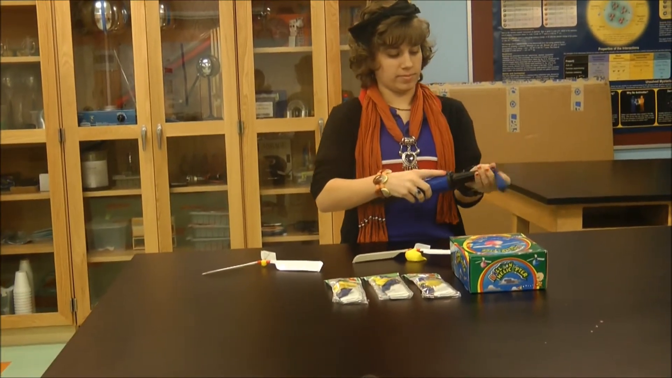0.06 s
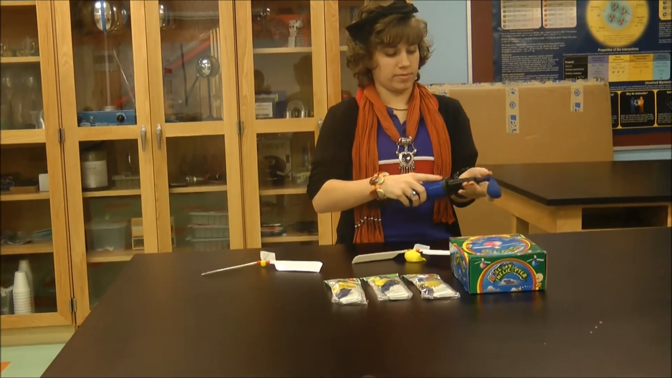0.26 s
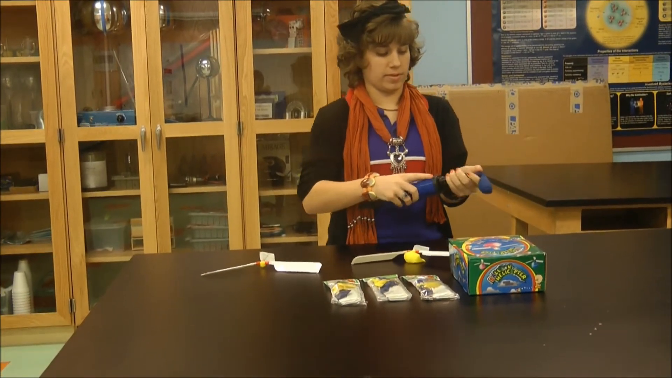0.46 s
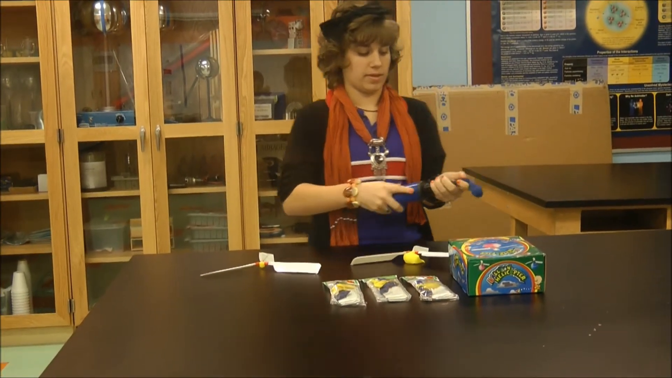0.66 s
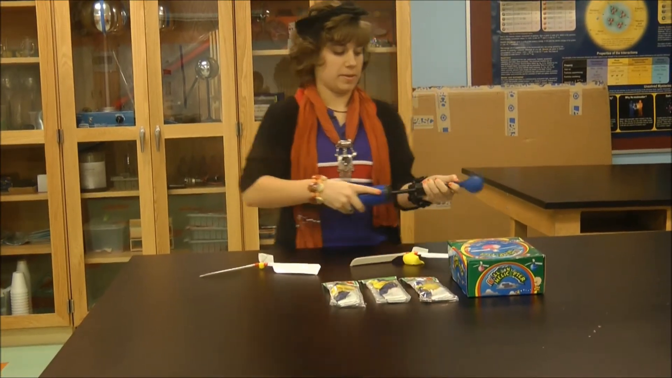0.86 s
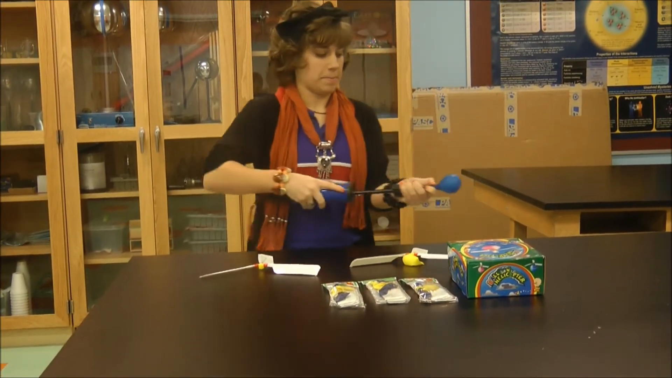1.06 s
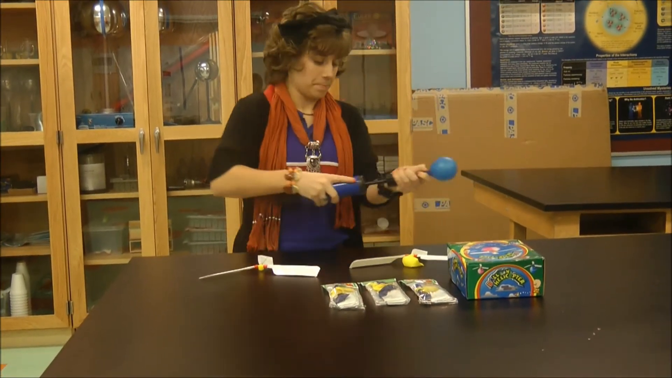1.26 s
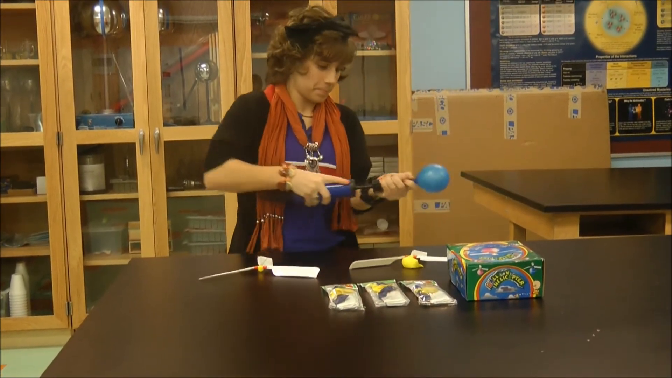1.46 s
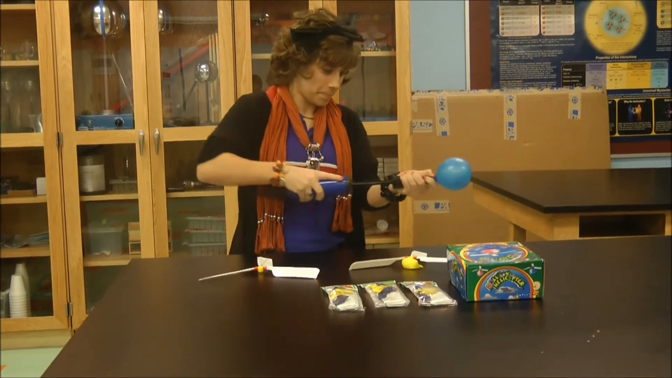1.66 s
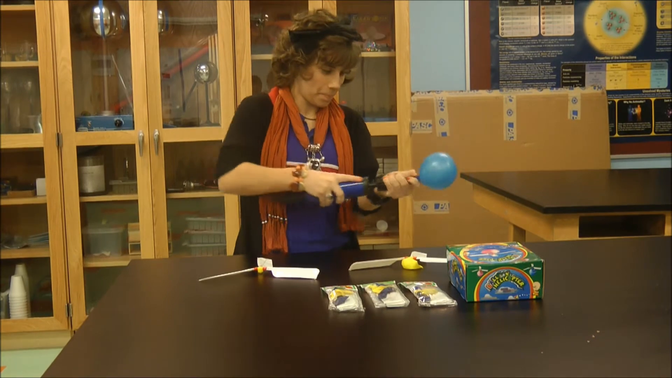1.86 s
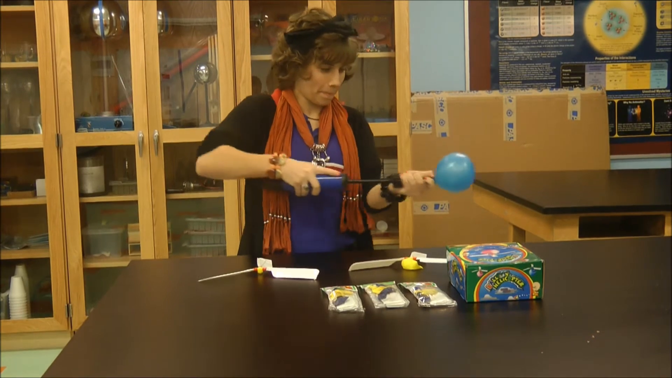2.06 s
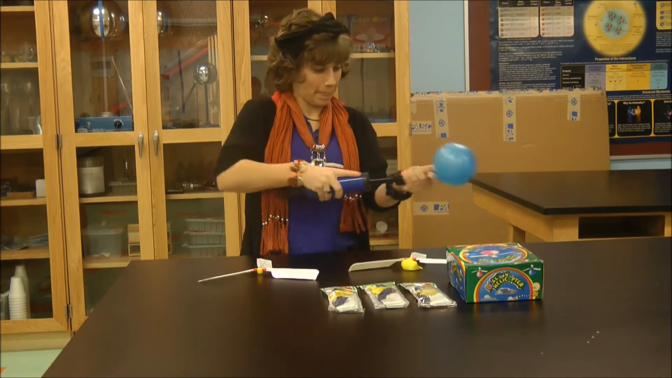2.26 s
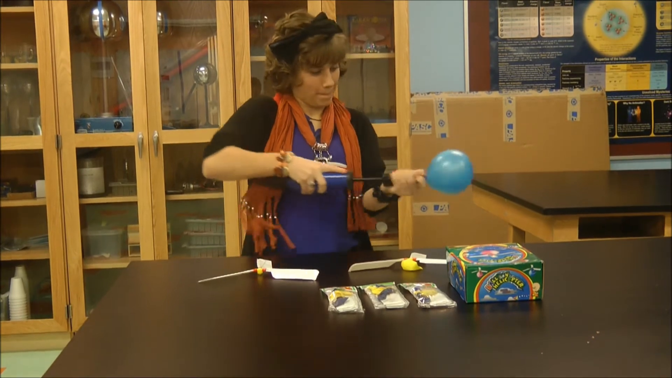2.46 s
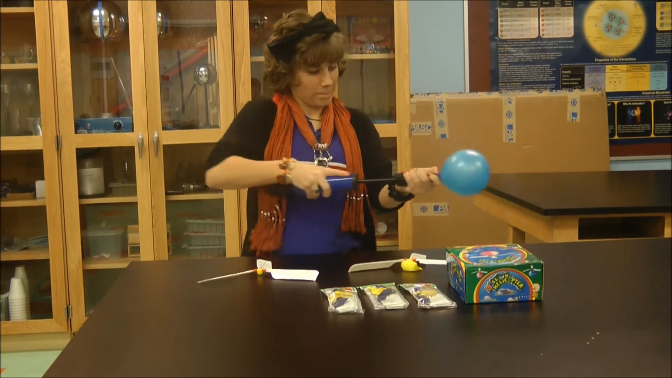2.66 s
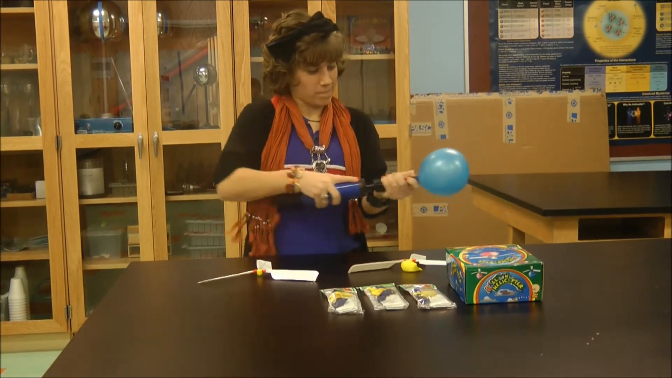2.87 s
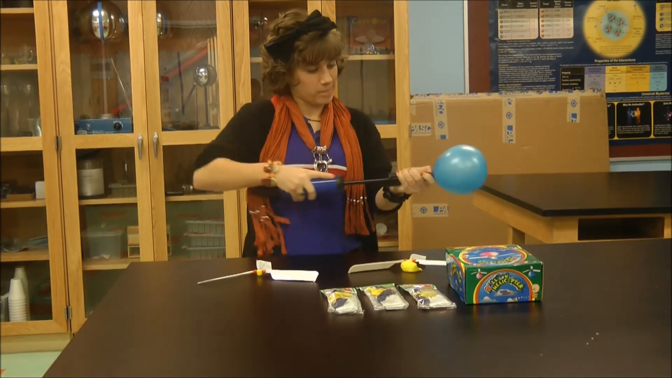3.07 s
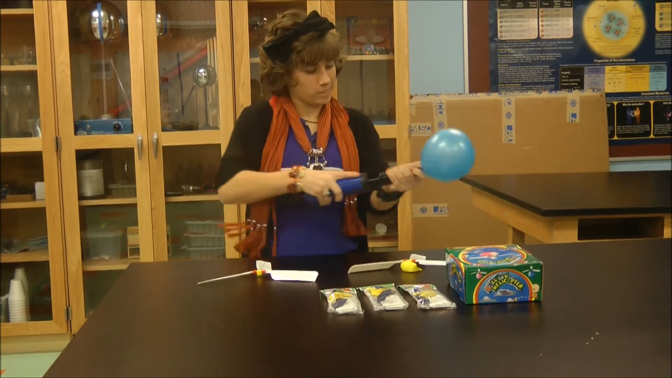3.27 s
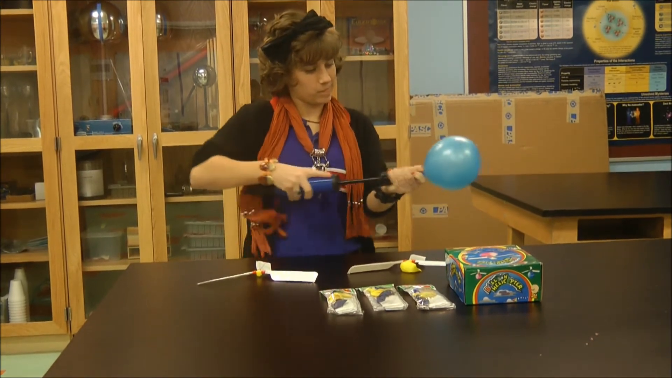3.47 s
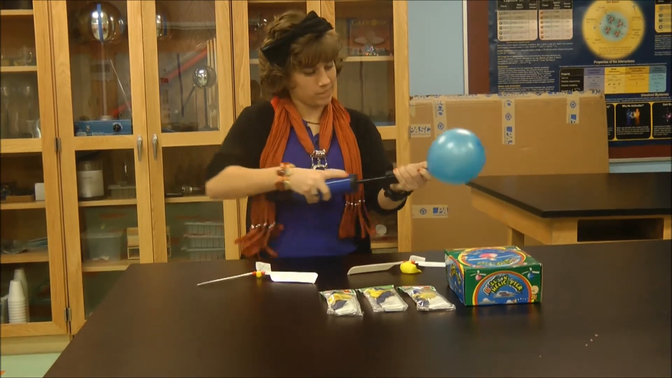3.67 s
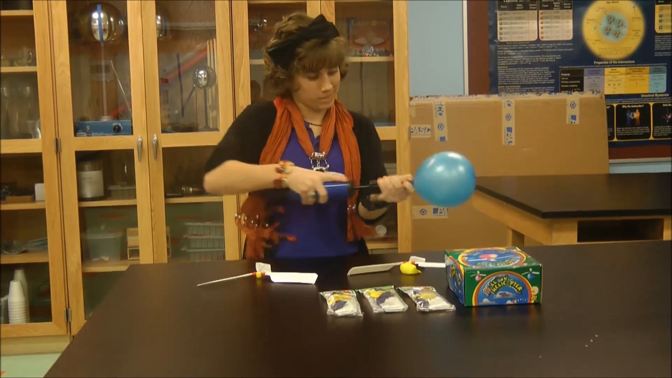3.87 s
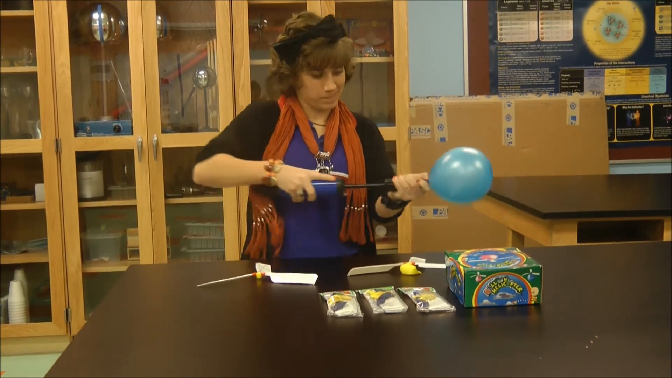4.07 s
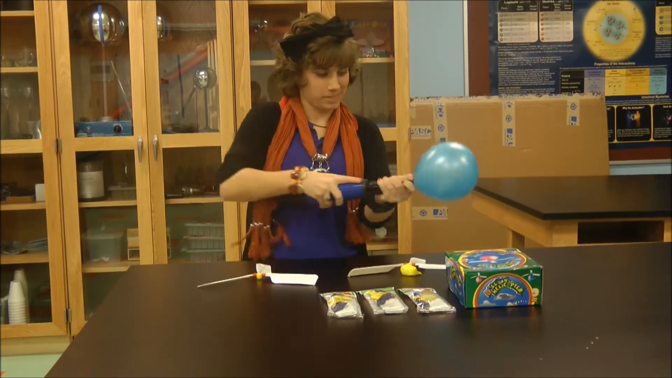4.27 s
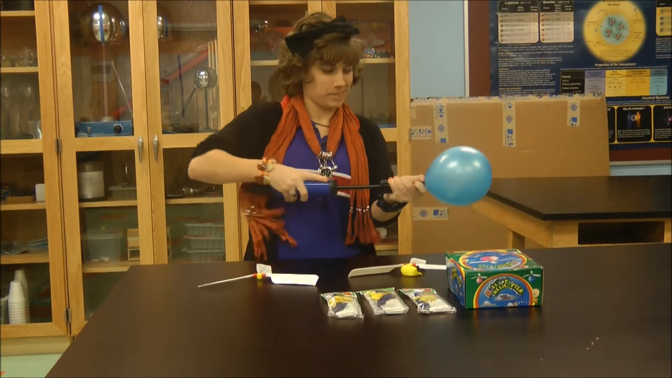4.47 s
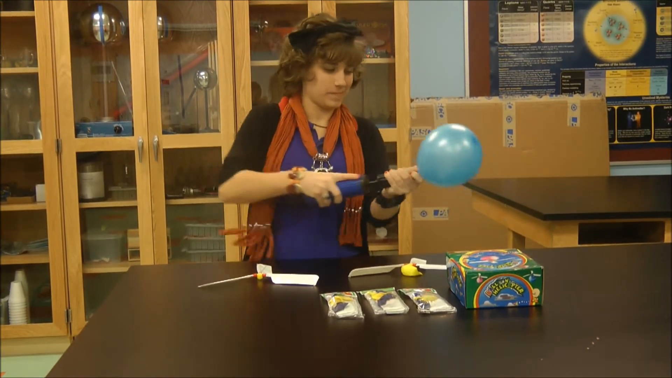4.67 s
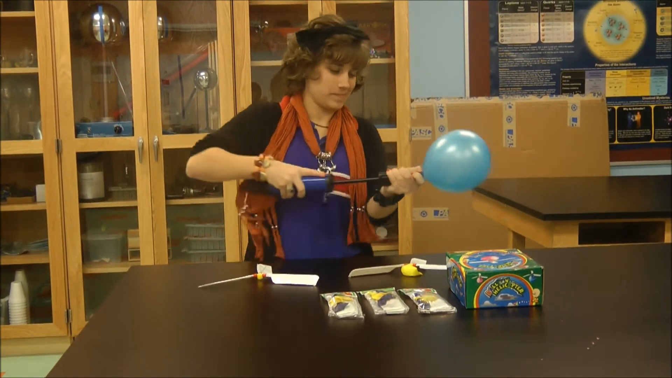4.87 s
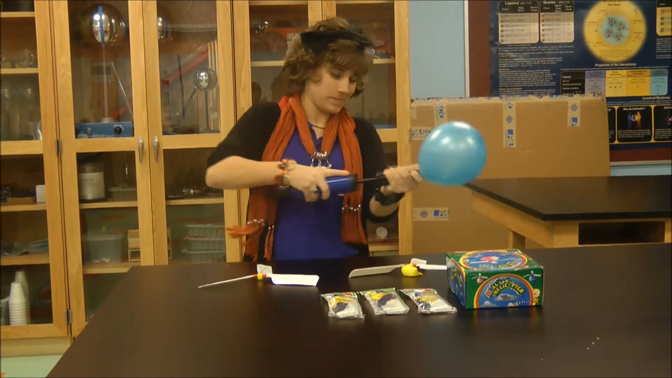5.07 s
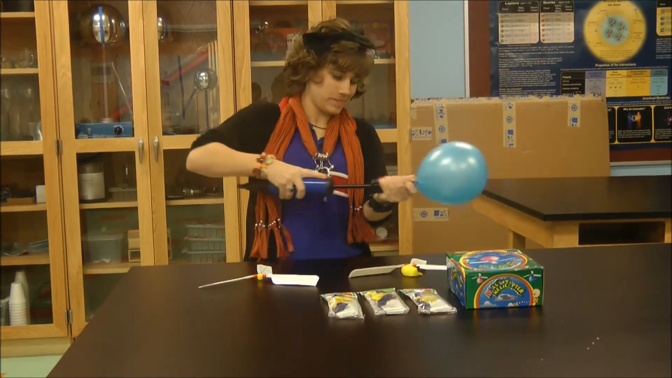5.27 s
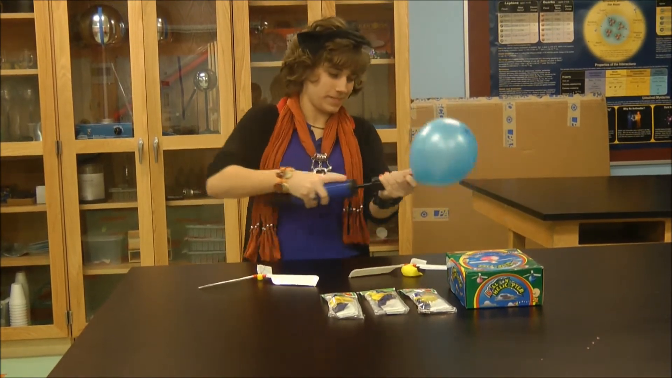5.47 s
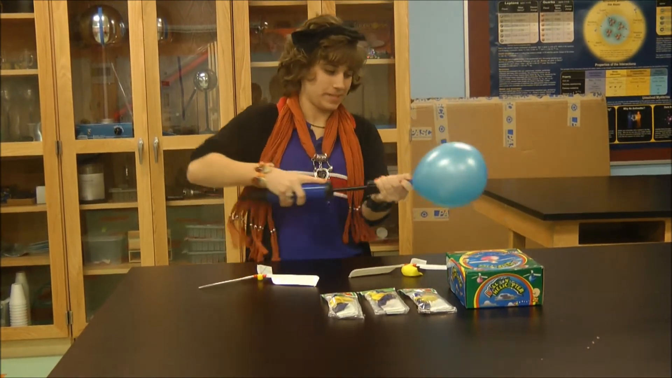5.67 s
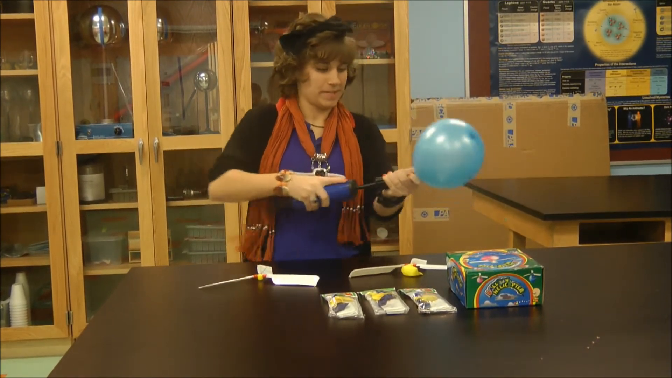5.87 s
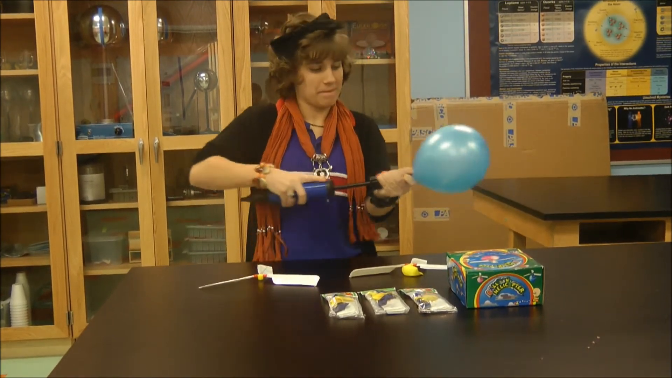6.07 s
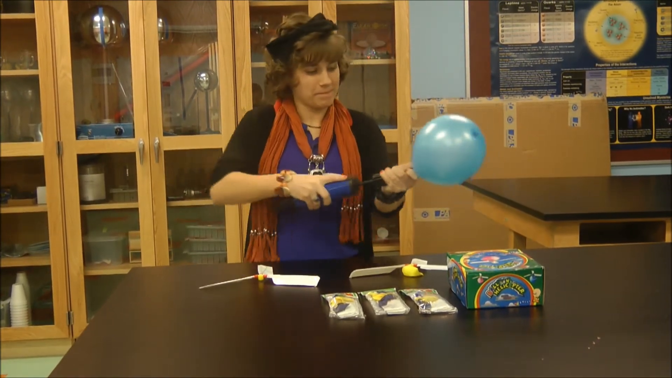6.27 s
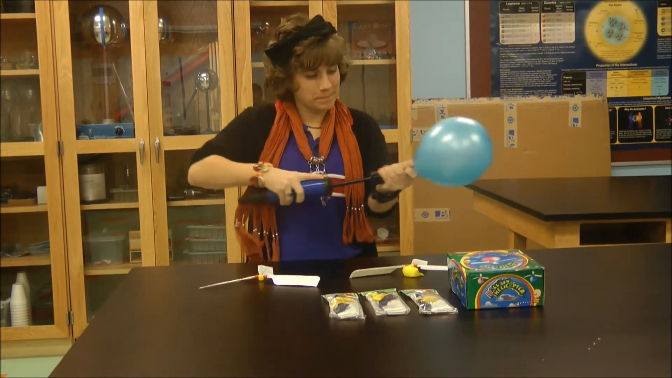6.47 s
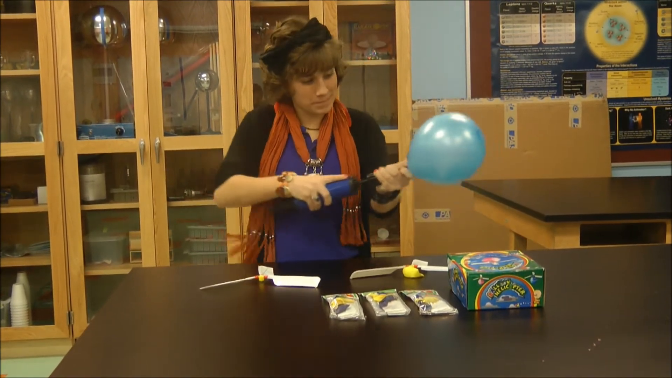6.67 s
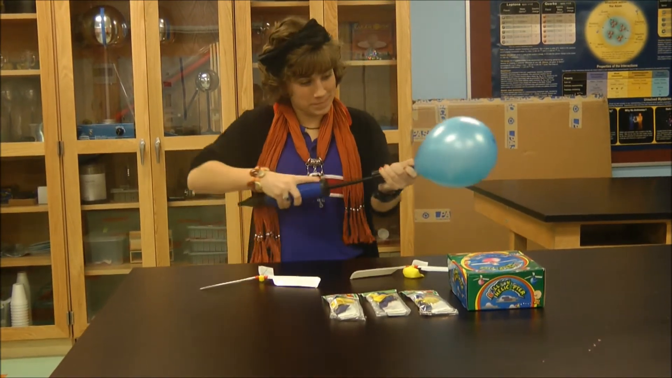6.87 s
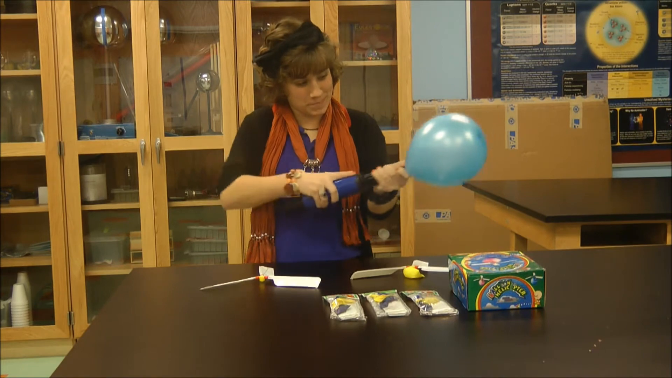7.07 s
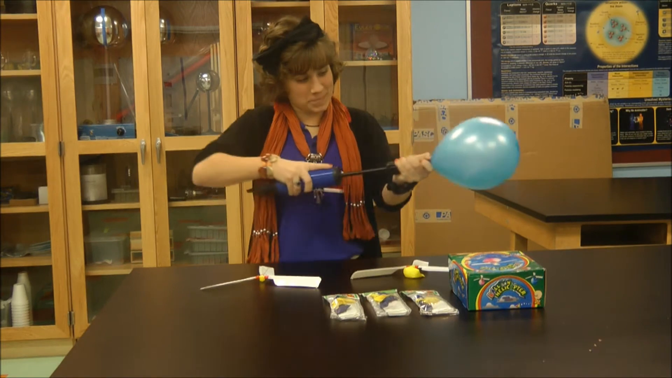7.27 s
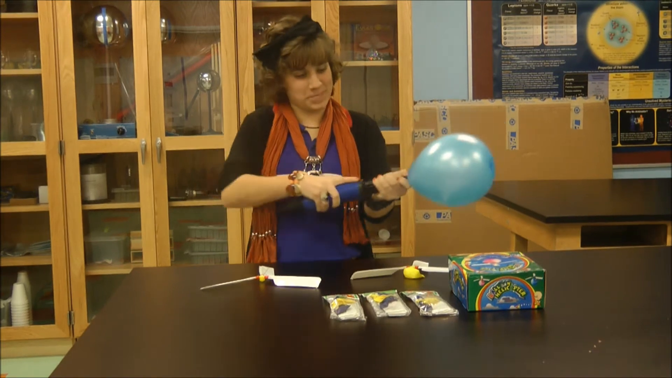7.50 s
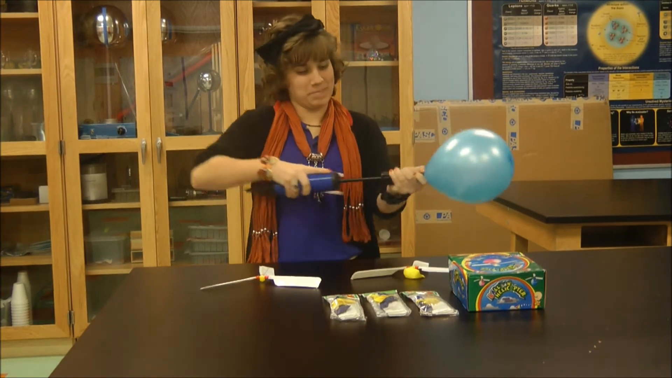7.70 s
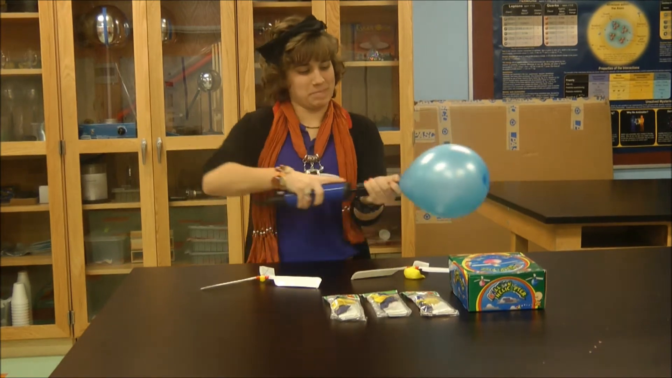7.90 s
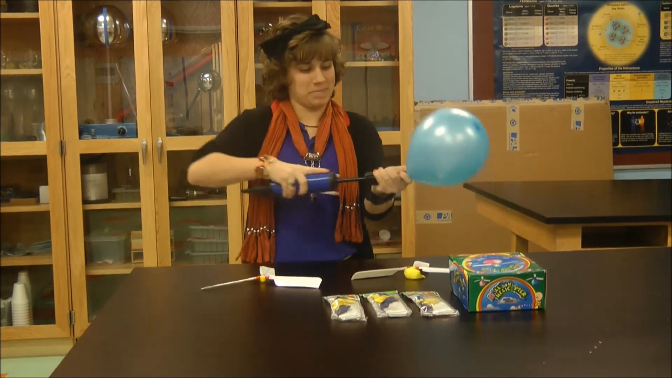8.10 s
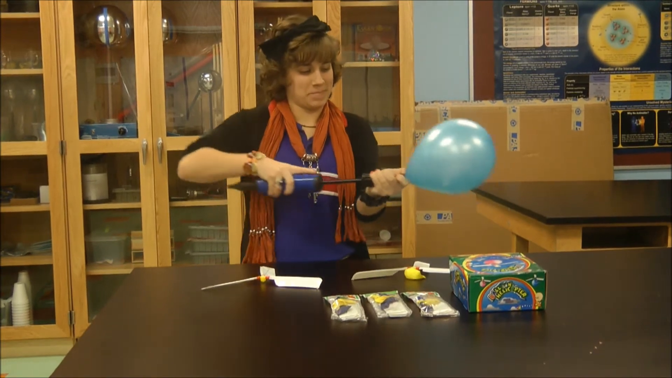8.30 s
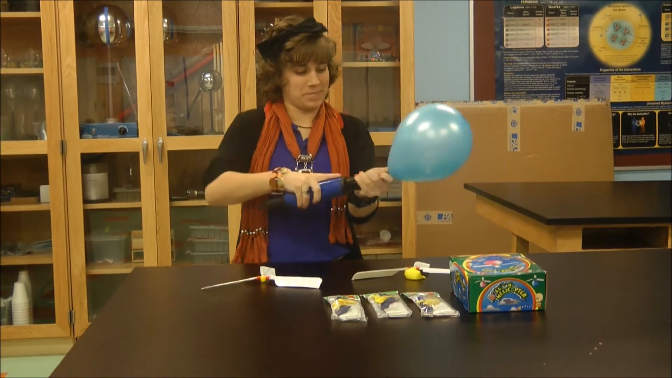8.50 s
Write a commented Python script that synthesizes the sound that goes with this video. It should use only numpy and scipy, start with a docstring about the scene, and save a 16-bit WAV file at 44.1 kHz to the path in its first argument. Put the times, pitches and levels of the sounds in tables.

```python
"""In a hard-walled laboratory, microphone a few metres off, over ventilation hum, fingers rustle on rubber and plastic ticks.
A plastic double-action hand pump gives one faint pull and a short faint puff, then quick pushes and pulls fill a balloon
until past eight seconds. Each stroke blows air through valve and neck: a hiss with two hollow resonances, a bright edge and
a duller barrel part. The neck whistles in the first two seconds, steady hollow tones come and go, and the piston thuds and
rattles at its end stops. The pump is shaped noise and decaying modes in the room; table levels are those before record()."""
import sys
import numpy as np
from scipy import signal
from scipy.fft import rfft, irfft, next_fast_len
from scipy.io import wavfile
from scipy.ndimage import uniform_filter1d

SR = 44100
rng = np.random.default_rng(int(sys.argv[2]) if len(sys.argv) > 2 else 0)


def materialize(psi):
    """Save the field psi as 16-bit PCM at rate SR to the path in sys.argv[1].

    A 1-D psi becomes a single channel; in a 2-D psi each row is a channel.
    """
    bounded = np.clip(np.atleast_2d(psi).T, -1, 1)
    quanta = np.round(bounded * 32767).astype(np.int16)
    wavfile.write(sys.argv[1], SR, quanta)


N = 376697


def undb(db):
    """Decibels to gain."""
    return 10 ** (np.asarray(db) / 20)


def level(x, db):
    """Scale to an rms level."""
    return x * undb(db) / np.sqrt(np.mean(x ** 2))


def bins(size):
    """Frequencies of a real spectrum in Hz, at least 1."""
    return np.maximum(np.fft.rfftfreq(size, 1 / SR), 1)


def table_gain(table, hz):
    """Gain of (Hz, dB) points joined on a log frequency axis."""
    points = np.array(table)
    return undb(np.interp(np.log(hz), np.log(points[:, 0]), points[:, 1]))


def filtered(x, gain):
    """Weight the spectrum of x by a gain per bin."""
    return irfft(rfft(x) * gain, len(x))


def noise(gain, size):
    """Noise coloured by a gain per bin, rms 1."""
    return level(filtered(rng.standard_normal(size), gain), 0)


def hollow(hz, centre_hz, width_hz):
    """Gain of one resonance."""
    return 1 / np.abs(1 + 1j * (hz ** 2 - centre_hz ** 2) / (hz * width_hz))


def walk(rate, size):
    """Random levels held 1 / rate s and slewed; spread near 1."""
    hold = int(SR / rate)
    steps = np.repeat(rng.standard_normal(size // hold + 1), hold)
    return 0.723 * uniform_filter1d(steps, hold)[:size]


def lag(x, tau_s):
    """One-pole smoothing."""
    keep = np.exp(-1 / (tau_s * SR))
    return signal.lfilter([1 - keep], [1, -keep], x)


def ring(modes, push_s):
    """Decaying modes, each slightly off pitch, after a smooth push; peak 1."""
    t = np.arange(int(.15 * SR)) / SR
    y = np.zeros(len(t))
    for hz, db, t60 in modes:
        pitch_hz = hz * (1 + 0.0369 * rng.standard_normal())
        y += undb(db) * np.sin(2 * np.pi * pitch_hz * t) * 1000 ** (-t / t60)
    y *= np.minimum(t / push_s, 1)
    return y / np.abs(y).max()


def add(out, s, x):
    """Mix x in at time s."""
    i = int(s * SR)
    out[i:i + len(x)] += x[:len(out) - i]


# spectrum of the ventilation air: pitch_hz [Hz], density_db [dB per Hz, relative]
VENT_SPECTRUM = [(20, -14), (60, -6.5), (180, -1.5), (330, -4.5), (600, -10), (800, -10), (1150, -20),
                 (2000, -12), (2800, -18.5), (4500, -14.5), (7500, -23.5), (16000, -27.5)]
# its stereo spread: pitch_hz [Hz], side_db [dB re mid]
VENT_SPREAD = [(25, 0), (100, -10.5), (500, -4.5), (1500, -11), (16000, -51)]
# fan tones: pitch_hz [Hz], level_db [dB rms]
FAN_TONES = [(264, -65.5), (490, -66), (786, -67), (981, -68), (1766, -73)]
VENT_DB = -54  # rms


def ventilation():
    """Steady air noise around the microphone, with fan tones wavering in pitch and level."""
    size = next_fast_len(N)
    spectrum = table_gain(VENT_SPECTRUM, bins(size))
    mid = noise(spectrum, size) * undb(VENT_DB + walk(7.8, size))
    side = undb(VENT_DB) * noise(spectrum, size)
    side = filtered(side, table_gain(VENT_SPREAD, bins(size)))
    for pitch_hz, db in FAN_TONES:
        phase = 2 * np.pi * np.cumsum(pitch_hz + 2.615 * walk(6, size)) / SR
        mid += level(np.sin(phase), db) * undb(0.5 * walk(3.9, size))
    return np.array([mid + side, mid - side])[:, :N]


# the laboratory's tail by band: pitch_hz [Hz], t60_s [s], level_db [dB], side_db [dB re mid]
ROOM_BANDS = [(150, 0.455, -5.5, -8.5), (495, 0.295, -1, -6), (986, 0.51, -3.5, -12),
              (2190, 0.66, -4.5, -10.5), (3495, 0.38, -6.5, -8.5), (5110, 0.484, -5, -13),
              (8320, 0.29, -4, -8), (10200, 0.28, -20.5, -35), (12650, .2, -21, -25.5)]
TABLE_ECHO_S, TABLE_ECHO_DB = .006, -8  # nominal delay, level re direct sound


def response():
    """Mid and side for one place: direct sound, one table echo, then a diffuse tail with its own decay per band."""
    size = 32768
    t, octave = np.arange(size) / SR, np.log2(bins(size))
    centres = np.log2([row[0] for row in ROOM_BANDS])
    mid, side = np.zeros(size), np.zeros(size)
    for k, (_, t60, db, side_db) in enumerate(ROOM_BANDS):
        share = np.sqrt(np.interp(octave, centres, np.arange(len(ROOM_BANDS)) == k))
        fade = 1000 ** (-t / t60) * np.clip(t / 0.014, 0, 1)
        fade = fade * undb(db) / np.sqrt(np.sum(fade ** 2))
        mid += filtered(rng.standard_normal(size), share) * fade
        side += filtered(rng.standard_normal(size), share) * fade * undb(side_db)
    mid[0] += 1
    side[0] += .025 * rng.standard_normal()  # a little to the left or right
    echo_s = TABLE_ECHO_S * (1 + .1 * rng.standard_normal())
    mid[int(echo_s * SR)] += undb(TABLE_ECHO_DB)
    return mid, side


def room(x, count=4):
    """The pump swings to and fro, so the sound leaves from a few places in turn, each with its own echo."""
    place = np.arange(N) / SR / .35  # next place every 0.35 s
    out = np.zeros((2, N))
    for k in range(count):
        near = np.clip(1 - np.abs((place - k + count / 2) % count - count / 2), 0, 1)
        mid, side = (signal.oaconvolve(x * near, h)[:N] for h in response())
        out += [mid + side, mid - side]
    return out


# fingers on rubber: start_s [s], fade_s [s, time constant], pitch_hz [Hz], width_hz [Hz], level_db [dB rms]
RUSTLE_ROW = (.035, .07, 3400, 3000, -58)


def rustle():
    """Fingers on rubber: dense tiny slips, thinning out, through one resonance."""
    s, fade_s, centre_hz, width_hz, db = RUSTLE_ROW
    size = int(3 * fade_s * SR)
    slips = rng.standard_normal(size) * undb(2.5 * rng.exponential(1, size))
    slips = slips * (rng.random(size) < .05)  # one sample in twenty slips
    slips = slips * np.exp(-np.arange(size) / (fade_s * SR))
    out = np.zeros(N)
    add(out, s, level(filtered(slips, hollow(bins(size), centre_hz, width_hz) ** 2), db))
    return out


# plastic ticks: start_s [s], level_db [dB peak of the body], pitch_hz [Hz], bright_db [dB re body]
PLASTIC_TICKS = [(.238, -43, 4590, -1), (.48, -29.5, 1970, -4.5), (.569, -12, 2138, -3),
                 (.736, -34, 1810, -4.5), (.888, -25, 2117, 3), (.893, -37, 2100, -5.5),
                 (1.083, -25.5, 1490, -9), (1.158, -10, 4440, -5), (4.314, -32, 670, -10),
                 (5.405, -33, 750, 10.5), (5.79, -36.5, 700, 8), (6.614, -29, 1080, -6),
                 (6.76, -40, 2050, -10), (7.021, -32, 804, -5.5), (7.379, -39.5, 1440, -8)]
# bright modes of the hard plastic: pitch_hz [Hz], level_db [dB], t60_s [s]
PLASTIC_MODES = [(2787, 5.5, 0.00397), (3468, 7, 0.00366), (4105, 3.5, 0.00412), (4726, -0.5, 0.00484),
                 (5500, -11.5, 0.0031), (6310, -8.5, 0.00624)]


def ticks():
    """Hard plastic parts snap together: three close body modes plus a bright set."""
    out = np.zeros(N)
    for s, db, hz, bright_db in PLASTIC_TICKS:
        body = ring([(hz, 0, .011), (0.911 * hz, -8, .008), (1.067 * hz, -2, .009)], 0.00113)
        add(out, s, undb(db) * (body + undb(bright_db) * ring(PLASTIC_MODES, 0.00088)))
    return out


def narrow_noise(table, sag_per_s, width):
    """Narrow noise at a falling or steady pitch, quick to start and slower to fade."""
    out = np.zeros(N)
    for s, length, hz, db in table:
        u = np.arange(int(length * SR)) / (length * SR)  # 0 to 1 along the tone
        phase = 2 * np.pi * np.cumsum(hz * (1 - sag_per_s * length * u)) / SR
        half_second = SR // 2
        band = 1 / (1 + (2 * bins(half_second) / (width * hz)) ** 2)
        a, b = (noise(band, half_second)[:len(u)] for _ in range(2))
        tone = a * np.cos(phase) + b * np.sin(phase)
        add(out, s, undb(db) * np.sin(np.pi * u ** 0.637) * tone)
    return out


# steady hollow tones: start_s [s], length_s [s], pitch_hz [Hz], level_db [dB rms at the crest]
STEADY_TONES = [(.76, 0.363, 2122, -48.5), (1.18, 0.109, 2135, -39), (3.512, 0.13, 716.5, -57),
                (4.57, 0.133, 570, -64.5), (5.321, 0.285, 570, -52), (5.605, .32, 706, -57),
                (5.872, 0.234, 704, -52.5), (6.142, 0.3, 713.3, -54), (6.639, 0.306, 732.5, -56),
                (8.15, 0.184, 788.6, -58.5)]


def hollow_tones():
    """Breathy steady tones, the first a tick's lingering ring, the others probably the balloon."""
    return narrow_noise(STEADY_TONES, 0, 0.105)  # width as a share of the pitch


# air whistling in the neck: start_s [s], length_s [s], pitch_hz [Hz, at the start], level_db [dB rms at the crest]
NECK_WHISTLES = [(.762, .05, 7960, -53.5), (.78, .11, 5740, -45), (1.07, 0.039, 7050, -51.5),
                 (1.125, 0.159, 4720, -26), (1.129, 0.102, 6453, -30), (1.14, 0.048, 11600, -41.5),
                 (1.278, 0.145, 6070, -30), (1.3, 0.132, 4240, -26.5), (1.316, 0.061, 7430, -36),
                 (1.455, 0.042, 5700, -26), (1.458, 0.077, 5330, -24.5), (1.627, .11, 6595, -35),
                 (1.644, 0.124, 5180, -32), (1.793, 0.093, 6275, -27.5), (1.8, 0.063, 11400, -37),
                 (1.966, .063, 4370, -43)]


def whistles():
    """Air whistling in the neck, sagging steadily in pitch along each tone."""
    return narrow_noise(NECK_WHISTLES, 0.57, 0.052)  # sag per s and width, shares of the pitch


# piston end stops: start_s [s], level_db [dB peak of the low boom]
END_STOPS = [(1.084, -37), (1.244, -32.5), (1.428, -31), (1.572, -35), (1.765, -32), (1.918, -33.5),
             (2.097, -32.5), (2.243, -32), (2.602, -35.5), (2.782, -39), (2.94, -34), (3.134, -37),
             (3.282, -37), (3.483, -34), (3.631, -35.5), (3.823, -32), (3.971, -34), (4.153, -34.5),
             (4.288, -32), (4.517, -32.5), (4.675, -31), (4.898, -36), (5.061, -34.5), (5.22, -38),
             (5.426, -31.5), (5.649, -38), (5.844, -33), (6.022, -40), (6.248, -35), (6.663, -35),
             (6.852, -37), (7.048, -26.5), (7.309, -40), (7.372, -39), (7.509, -25.5), (7.771, -41),
             (7.825, -34.5), (7.965, -26), (8.476, -24)]
# low boom, upper boom and knock modes of a stop: pitch_hz [Hz], level_db [dB], t60_s [s]
BOOM_MODES = [(179.4, -2, 0.0773), (209.46, 1, 0.0832), (270.1, -2, 0.098), (310, -8, 0.042)]
UPPER_BOOM_MODES = [(347, -4, 0.0302), (392.2, -4.5, 0.0623), (434, -1.5, 0.0165), (570, -4.5, 0.0565)]
STOP_KNOCK_MODES = [(725.5, 1, 0.0204), (1083, -5.5, 0.027), (1173, -8.5, 0.0136), (1340, -3, 0.03),
                    (1690, -33.5, 0.01)]
# pitch drift of the rattle by direction of the nearest stroke: glide_per_s [share of pitch per s]
RATTLE_GLIDE = {"push": -1.56, "pull": 5.98}
UPPER_DB, KNOCK_DB, KNOCK_GROWS_DB_PER_S, RATTLE_DB = -6.5, -5.5, 1.0856, -9.5  # re the low boom
RATTLE_UPPER_DB = -1  # re the rattle's low modes
STOP_SCATTER_DB = 1
USUAL_STOP_DB, RATTLE_LAGS = -32.5, 0.354  # share of a harder stop's extra level that the rattle does not follow


def stops():
    """The piston meets the end cap: barrel and balloon boom, then the loose rod bounces a few times."""
    out = np.zeros(N)
    chance = rng.random((len(END_STOPS), 2, 5))
    tilts = STOP_SCATTER_DB * rng.standard_normal((len(END_STOPS), 2))
    for (s, db), (gaps, sizes), (upper, knock) in zip(END_STOPS, chance, tilts):
        boom = ring(BOOM_MODES, 0.0006) + undb(UPPER_DB + upper) * ring(UPPER_BOOM_MODES, 0.00259)
        knock_db = KNOCK_DB + KNOCK_GROWS_DB_PER_S * s + knock
        add(out, s, undb(db) * (boom + undb(knock_db) * ring(STOP_KNOCK_MODES, 0.00032)))
        begins, _, _, way = min(PUMP_STROKES, key=lambda row: abs(row[0] - s))
        rattle_db = db + RATTLE_DB - RATTLE_LAGS * (db - USUAL_STOP_DB)
        for late, size in zip(np.cumsum(.018 + 0.018 * gaps), sizes):
            # the air column changes length once the stroke begins
            glide = 1 + RATTLE_GLIDE[way] * max(s + late - begins, 0)
            column = [(hz * glide, mode_db, t60) for hz, mode_db, t60 in BOOM_MODES]
            bounce = ring(column, 0.00587)
            bounce = bounce + undb(RATTLE_UPPER_DB + upper) * ring(UPPER_BOOM_MODES, 0.00242)
            bounce_db = rattle_db - 2.4 * size - 48 * late
            add(out, min(s + late, (N - 1) / SR), undb(bounce_db) * bounce)
    return out


def patchy(size, step_hz, spread_db):
    """A random uneven colour, drawn anew for each part of each stroke's hiss."""
    knots = np.arange(0, SR / 2 + step_hz, step_hz)
    return undb(spread_db * np.interp(bins(size), knots, rng.standard_normal(200)[:len(knots)]))


# bright edge of the jet: pitch_hz [Hz], density_db [dB per Hz, relative]
EDGE_SPECTRUM = [(5000, -42.5), (7000, -10), (9400, 4), (13000, 2.5), (15200, -1.5), (17000, 1)]


def edge_hiss(size):
    """The bright part of the jet, rms 1; its lower and upper halves flicker apart."""
    hz = bins(size)
    lower = np.clip((11500 - hz) / 3000 + .5, 0, 1)
    halves = []
    for share in np.sqrt([lower, 1 - lower]):
        flicker = undb(1.2 * walk(22.4, size))
        halves.append(share * rfft(rng.standard_normal(size) * flicker))
    jet = halves[0] + undb(-0.5) * halves[1]
    return level(irfft(jet * table_gain(EDGE_SPECTRUM, hz) * patchy(size, 497, 1.8), size), 0)


# pump strokes: start_s [s], pressed_s [s, time under pressure], level_db [dB, hiss], direction [push or pull];
# the second row is no real pull but slack taken up before the first push, played with the pull's settings
PUMP_STROKES = [(.728, 0.255, -45, "pull"), (1.065, .035, -42.5, "pull"), (1.105, 0.0595, -25.5, "push"),
                (1.268, 0.0695, -23.5, "pull"), (1.442, 0.0372, -23.5, "push"),
                (1.605, 0.0625, -23.5, "pull"), (1.778, 0.0484, -22, "push"), (1.945, 0.068, -23, "pull"),
                (2.101, 0.057, -22.5, "push"), (2.256, 0.0992, -23, "pull"), (2.462, 0.057, -22, "push"),
                (2.62, 0.0853, -23.5, "pull"), (2.79, 0.0646, -21, "push"), (2.959, 0.09, -23, "pull"),
                (3.141, 0.0556, -22, "push"), (3.308, 0.0723, -23.5, "pull"), (3.494, 0.0452, -22, "push"),
                (3.643, 0.0843, -22.5, "pull"), (3.83, 0.0518, -22, "push"), (3.984, 0.0824, -25, "pull"),
                (4.162, 0.0567, -22, "push"), (4.328, 0.082, -23, "pull"), (4.521, 0.0629, -22, "push"),
                (4.691, 0.0943, -23, "pull"), (4.903, 0.0672, -23, "push"), (5.07, 0.0932, -22.5, "pull"),
                (5.284, 0.0708, -20.5, "push"), (5.458, 0.1014, -24, "pull"), (5.675, 0.067, -22.5, "push"),
                (5.859, 0.0947, -22.5, "pull"), (6.077, 0.0648, -21.5, "push"),
                (6.268, 0.0942, -24, "pull"), (6.485, 0.0733, -22.5, "push"), (6.681, .112, -23, "pull"),
                (6.907, 0.0788, -20.5, "push"), (7.126, 0.1038, -24, "pull"), (7.37, .087, -20.5, "push"),
                (7.594, 0.0997, -23, "pull"), (7.815, 0.0973, -21, "push"), (8.044, 0.1278, -23, "pull"),
                (8.318, 0.107, -24, "push")]
# by direction: rise_share [of pressed_s], edge_db [dB re hiss], edge_fades [dB per s],
# low_hz [Hz, low resonance at time 0], climb [Hz per s]
STROKE_WAYS = {"push": (1.1863, -5.5, 1, 4200.5, 70.5), "pull": (0.7428, -9.5, 0.71, 4224.5, 39.5)}
# dull air in the barrel: pitch_hz [Hz], density_db [dB per Hz, relative]
BARREL_SPECTRUM = [(300, -21), (700, -7.5), (1000, -14), (1410, -6), (1590, -8.5), (1780, -2.5), (2200, 0),
                   (2900, 3), (3600, 3.5), (5000, -16), (7500, -1), (9000, -61.5)]
LONGEST_RISE_S, FALL_S = 0.0923, 0.1285
HIGH_HZ, HIGH_SCATTER, HIGH_DB, HIGH_SCATTER_DB = 5700, 0.065, -6, 1  # upper resonance, scatter as share, re hiss
BARREL_DB, BARREL_GROWS_DB_PER_S = -17.5, 0.92  # re hiss; a fuller balloon pushes back harder
FULL_STROKE_DB, BARREL_KEEPS = -23, 0.622  # share of a weak stroke's loss that spares the barrel
LIMP_BARREL_DB, LIMP_S = 8.5, 0.398  # extra rush around the first push, while the rubber is still limp


def strokes():
    """Turbulent air of each stroke: hiss, edge and barrel follow different powers of the piston speed."""
    out = np.zeros(N)
    scatter = rng.standard_normal((len(PUMP_STROKES), 2))
    first_push_s = PUMP_STROKES[2][0]
    for (s, pressed, db, way), chance in zip(PUMP_STROKES, scatter):
        share, edge_db, edge_fades, low_hz, climb = STROKE_WAYS[way]
        rise = min(share * pressed, LONGEST_RISE_S)
        edge_db, low_hz = edge_db - edge_fades * s, low_hz + climb * s
        high_hz = HIGH_HZ * (1 + HIGH_SCATTER * chance[0])
        high_db = HIGH_DB + HIGH_SCATTER_DB * chance[1]
        barrel_db = BARREL_DB + BARREL_GROWS_DB_PER_S * s + BARREL_KEEPS * (FULL_STROKE_DB - db)
        barrel_db += LIMP_BARREL_DB * np.exp(-abs(s - first_push_s) / LIMP_S)

        size = next_fast_len(int((pressed + FALL_S + 0.22) * SR))
        t, hz = np.arange(size) / SR, bins(size)
        up = np.sin(np.pi / 2 * np.clip(t / rise, 0, 1))
        speed = up * np.sin(np.pi / 2 * np.clip((pressed + FALL_S - t) / FALL_S, 0, 1))
        # the pressed air keeps leaking through the neck a little after the piston slows
        flow = np.maximum(speed, lag(speed, 0.0855))

        # a small balloon is a sharp cavity; the resonances blur as it swells
        blur = 1 - 0.333 * np.exp(-s / 0.924)
        low_gain = hollow(hz, low_hz, 1900 * blur) ** 2 * patchy(size, 254.6, 1.49)
        low_gain = low_gain / np.hypot(1, (3600 / hz) ** 5)  # little below 3600 Hz
        low = noise(low_gain, size) * undb(0.73 * walk(74.3, size))
        high_gain = hollow(hz, high_hz, 2200 * blur) ** 2 * patchy(size, 250.9, 2.4)
        high = noise(high_gain, size) * undb(high_db + 1.75 * walk(52.2, size))
        # one part of the edge snaps with the speed, the other builds slowly and lingers
        edge_shape = lag(speed ** 2.18, 0.0018) + 0.727 * lag(speed, 0.269)
        edge = edge_hiss(size) * undb(edge_db) * edge_shape
        barrel_gain = table_gain(BARREL_SPECTRUM, hz) * patchy(size, 193.8, 2.4)
        barrel = noise(barrel_gain, size) * undb(barrel_db)

        gusts = undb(0.47 * walk(91.4, size))  # eddies make the whole jet flutter
        jet = (low + high) * flow ** 1.955 + edge + barrel * flow ** 1.426
        add(out, s, undb(db) * gusts * jet)
    return out


def scene():
    """Pump in the room over the ventilation; so small a body radiates no deep bass."""
    pump = strokes() + whistles() + hollow_tones() + stops() + ticks() + rustle()
    pump = signal.sosfilt(signal.butter(3, 140, "high", fs=SR, output="sos"), pump)
    return room(pump) + ventilation()


def record(dry):
    """Stereo microphone: slow gain control, a right channel a shade louder and a top cut at 15.7 kHz."""
    loud = np.sqrt(lag(np.mean(dry ** 2, axis=0), 0.514))
    wet = dry * (1 + loud / 0.0362) ** -.25 * undb(np.array([[-.15], [.15]]))
    return signal.sosfiltfilt(signal.ellip(10, .1, 50, 15700, fs=SR, output="sos"), wet)


dry = scene()
out = record(dry)
materialize(out)
```